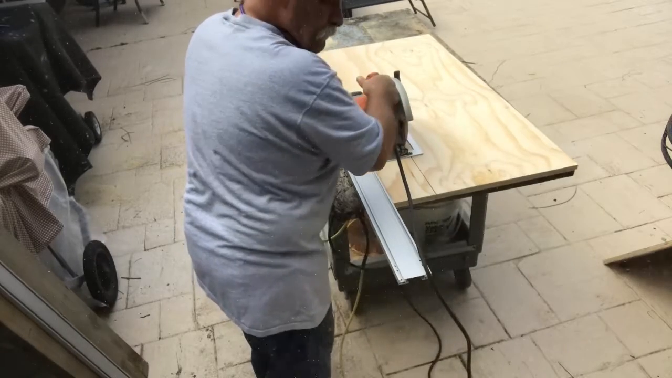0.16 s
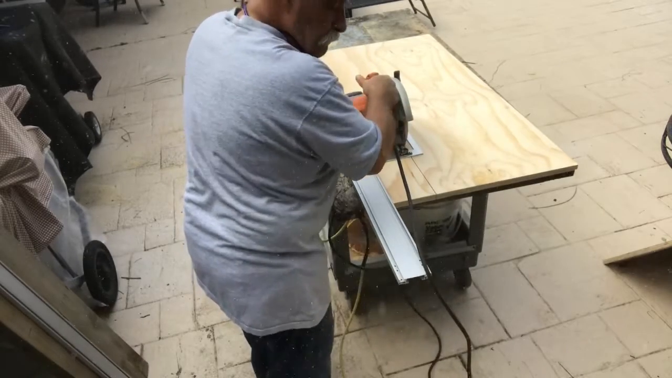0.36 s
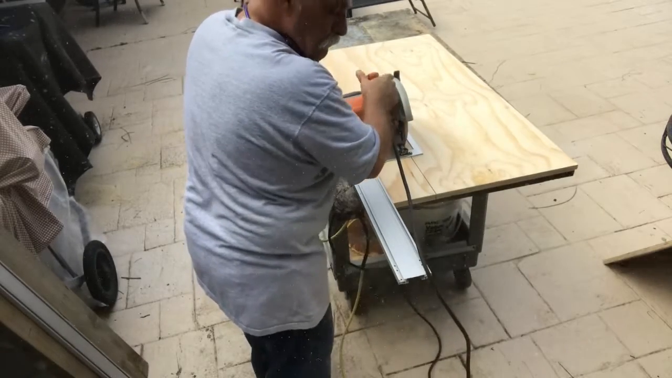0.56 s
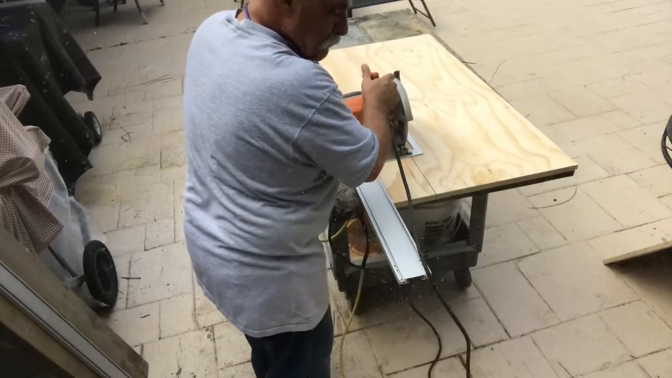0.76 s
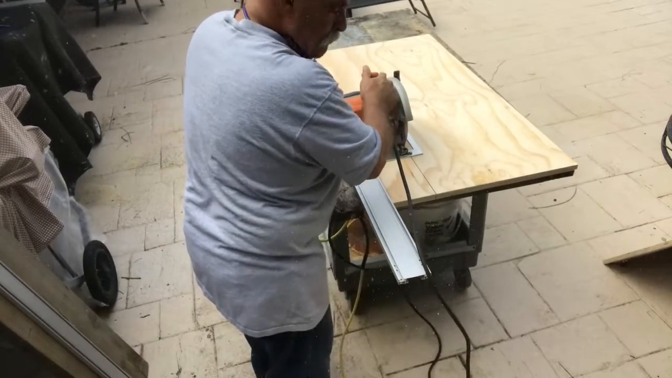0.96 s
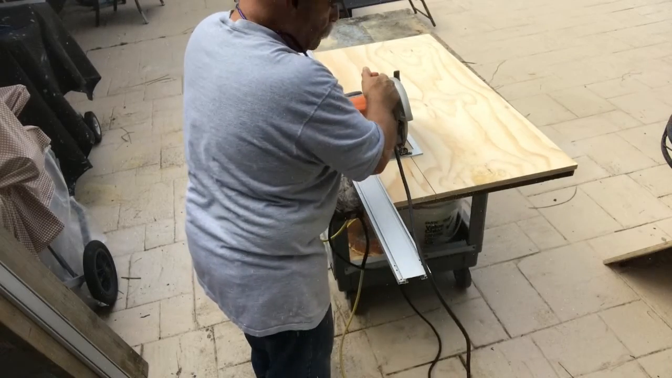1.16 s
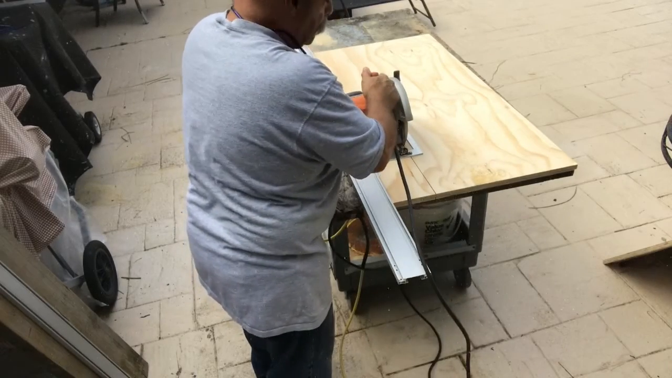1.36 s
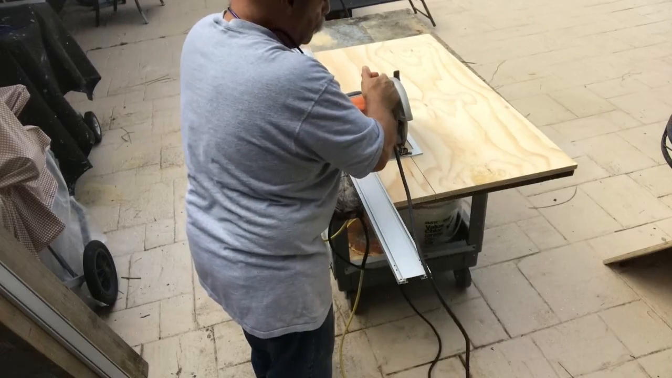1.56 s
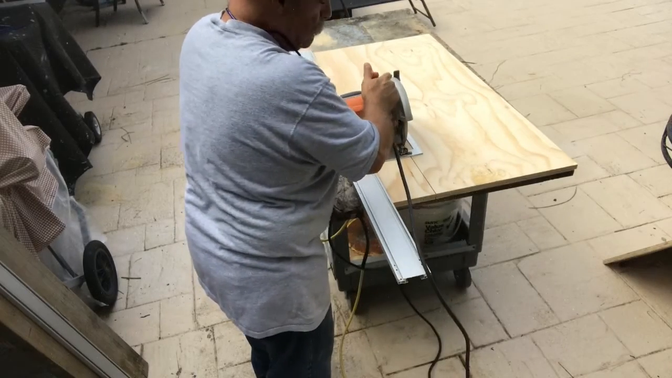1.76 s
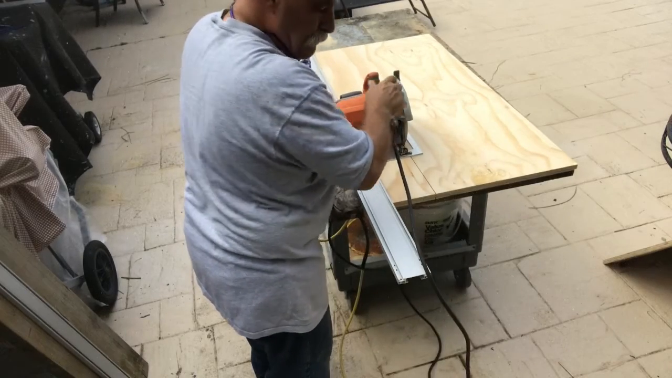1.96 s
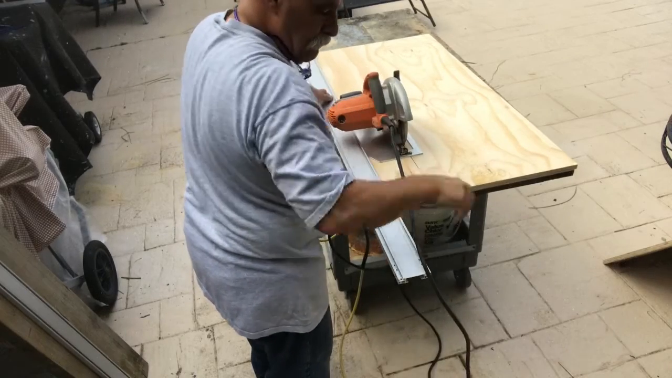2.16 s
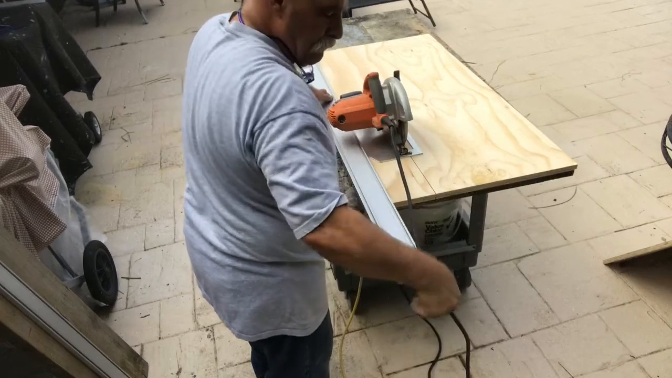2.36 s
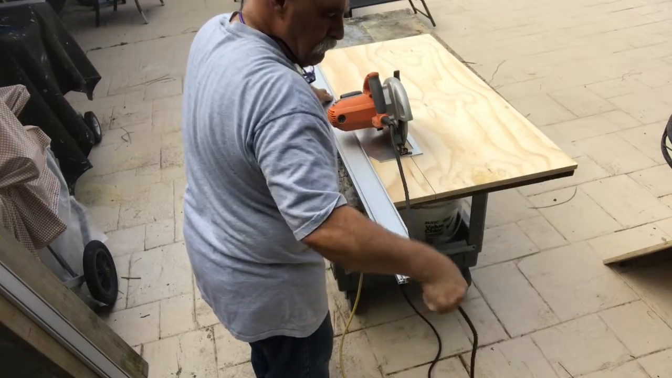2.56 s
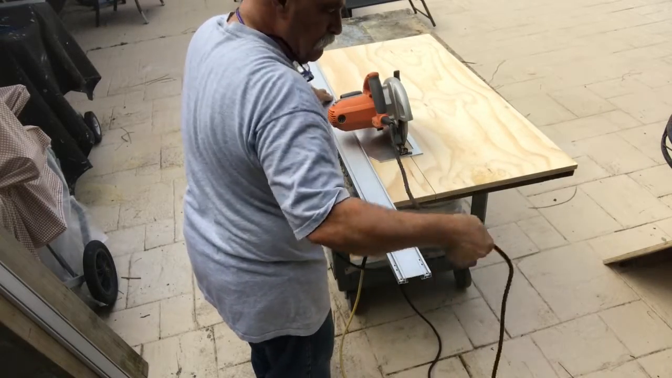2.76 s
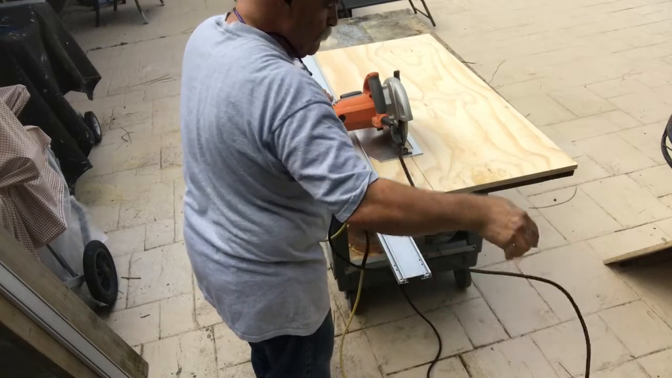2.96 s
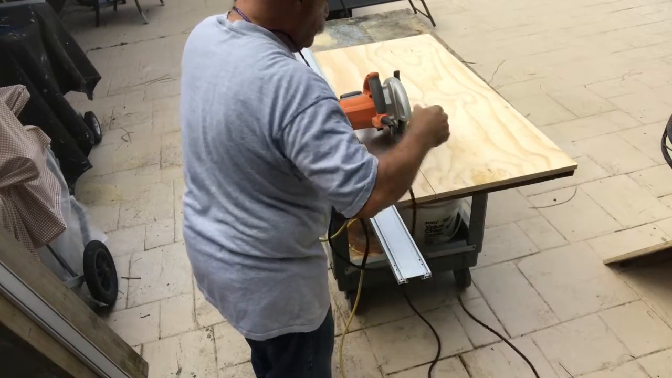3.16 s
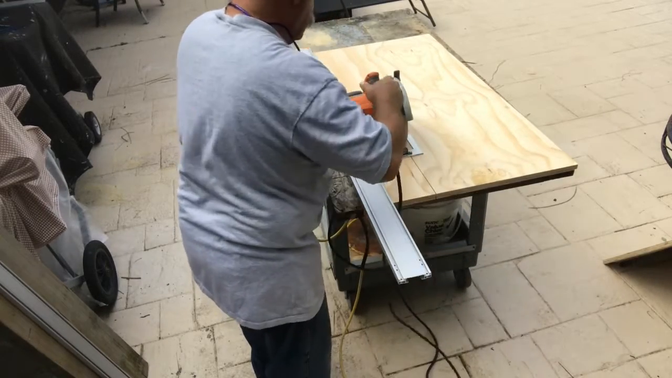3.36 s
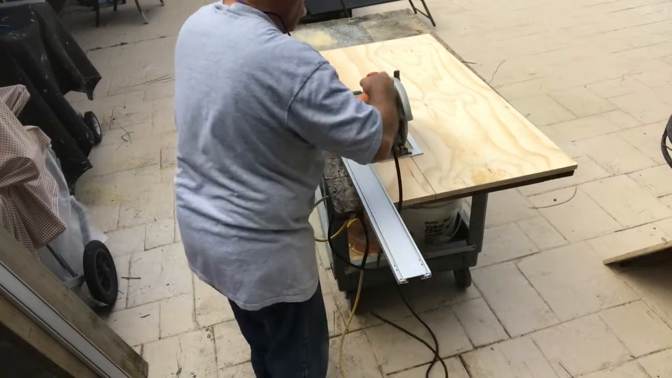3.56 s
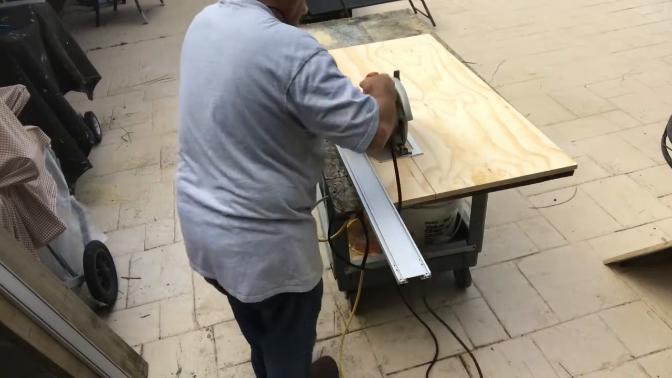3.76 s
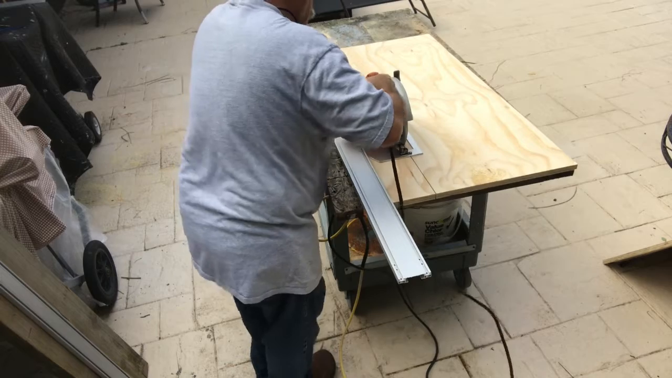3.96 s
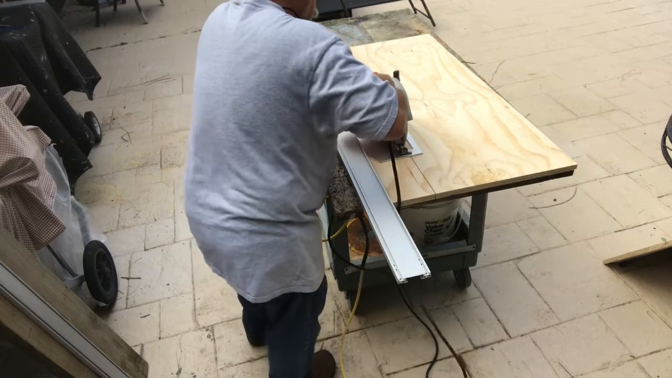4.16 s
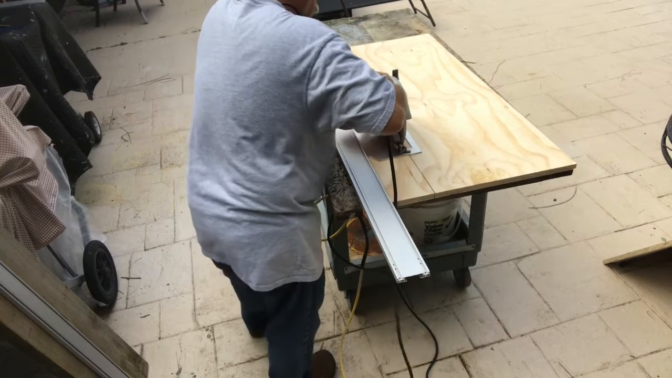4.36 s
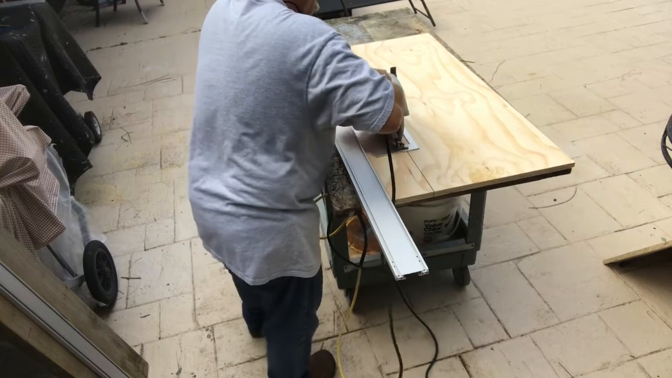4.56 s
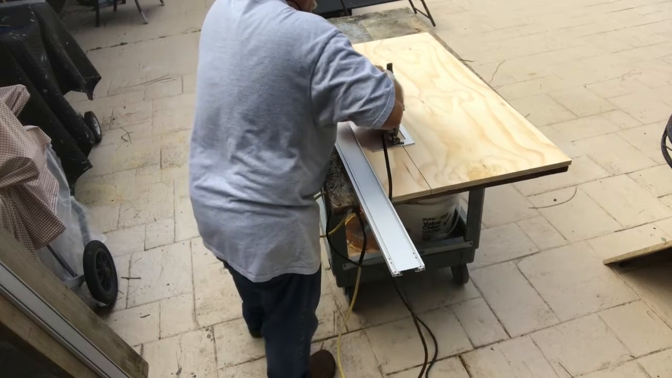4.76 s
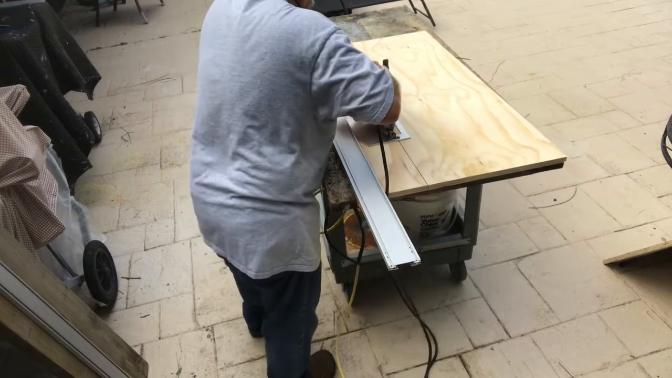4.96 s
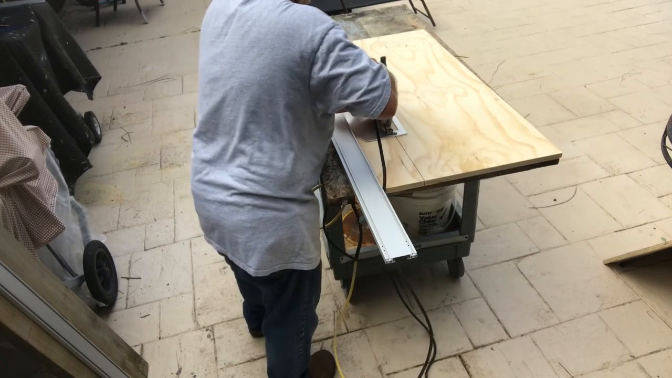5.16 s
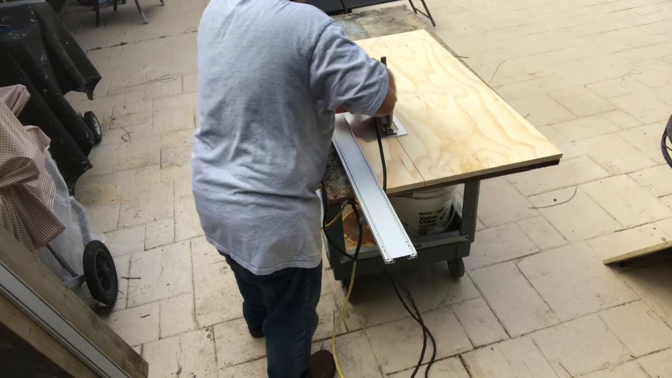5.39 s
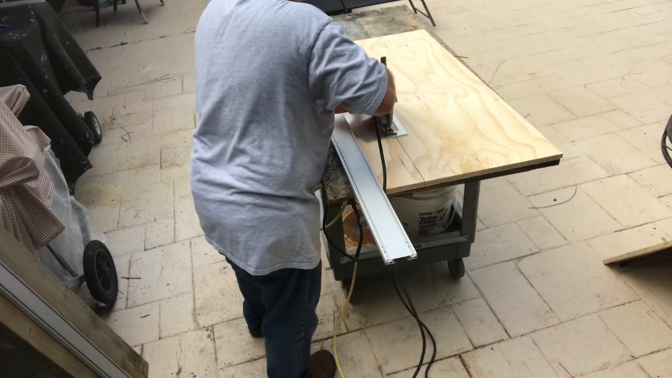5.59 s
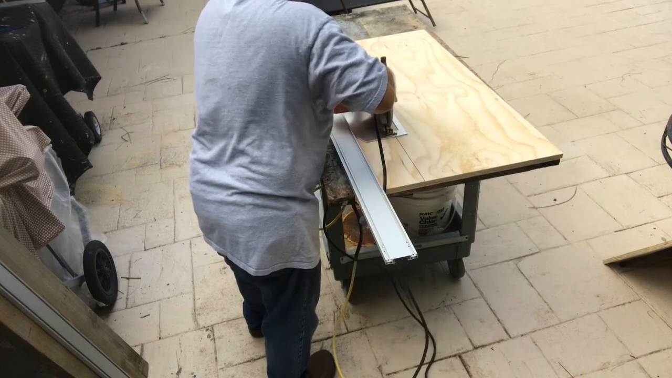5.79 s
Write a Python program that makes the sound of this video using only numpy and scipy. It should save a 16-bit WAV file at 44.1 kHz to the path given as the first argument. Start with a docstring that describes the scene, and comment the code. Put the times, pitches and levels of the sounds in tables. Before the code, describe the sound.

A circular saw coasts down with a slowing, throbbing metallic whir, stops, gets bumped and scraped into place, then roars back up outdoors.

```python
"""Circular saw coasting, then restarted

A corded saw on a plywood sheet coasts to a stop: noise bands throb once a blade turn over wavering steel modes.
It is slid (scraping noise) and knocked (short decaying tones) into place, then switched on: mains hum, gear
whine following the rising speed, rattle and air roar as filtered noise.
A distant machine drones at a steady pitch over low wind rumble."""
import sys
import numpy as np
from scipy import signal
from scipy.fft import rfft, irfft
from scipy.io import wavfile
from scipy.ndimage import uniform_filter1d

SR = 44100
rng = np.random.default_rng(int(sys.argv[2]) if len(sys.argv) > 2 else 0)


def wav_out(sig):
    """Save sig, one row per channel (or a flat mono array), as 16-bit PCM at SR to the path in sys.argv[1]."""
    wavfile.write(sys.argv[1], SR, np.round(np.clip(np.atleast_2d(sig).T, -1, 1) * 32767).astype(np.int16))


N = 257103
SWITCH_ON_S, STRAIN_ENDS_S = 4.214, 4.44


def undb(db):
    """Decibels to gain."""
    return 10 ** (np.asarray(db) / 20)


def unit(x):
    """Scale to rms 1."""
    return x / np.sqrt(np.mean(x ** 2))


def seconds():
    """Time of every sample."""
    return np.arange(N) / SR


def columns(rows, silent=None):
    s, *cols = np.transpose(rows)
    return [np.interp(seconds(), s, col, silent, silent) for col in cols]


def hertz():
    """Frequencies of the spectrum lines, raised 1 Hz to keep the log finite."""
    return np.fft.rfftfreq(N, 1 / SR) + 1


def shape(points):
    """dB of (Hz, dB) points at every spectrum line, joined on a log frequency axis."""
    hz, db = np.transpose(points)
    return np.interp(np.log(hertz()), np.log(hz), db)


def colour(x, gain):
    """Filter by a gain for each spectrum line; rms 1."""
    return unit(irfft(rfft(x) * gain, N))


def walk(rate_hz):
    """Random levels held 1 / rate_hz, smoothed twice; rms about 1."""
    hold = int(SR / rate_hz)
    levels = np.repeat(rng.standard_normal(N // hold + 1), hold)
    return unit(uniform_filter1d(uniform_filter1d(levels, hold), hold)[:N])


def tone(hz, waver_hz, rate_hz, flutter_db):
    """Sine of rms about 1 whose pitch and level wander independently."""
    level = np.sqrt(2) * undb(flutter_db * walk(rate_hz))
    phase = 2 * np.pi * np.cumsum(hz + waver_hz * walk(rate_hz)) / SR
    return level * np.sin(phase)


def decay(t, t60_s):
    """Exponential decay, 60 dB in t60_s."""
    return np.exp(-np.log(1000) * t / t60_s)


def add(out, s, blow, peak_db):
    """Lay a blow into the track at its peak level."""
    start = int(s * SR)
    out[start:start + len(blow)] += undb(peak_db) * blow / np.abs(blow).max()


def step(s, edge_s):
    """Smooth rise from 0 to 1 around time s."""
    return .5 + .5 * np.tanh((seconds() - s) / edge_s)


def swell(s, length_s, db, edge_s):
    """Gain that rises, holds and falls away."""
    return undb(db) * step(s, edge_s) * (1 - step(s + length_s, edge_s))


def switched(rise_s):
    """Time since switch-on, and a gain that builds from it."""
    since_s = np.maximum(seconds() - SWITCH_ON_S, 0)
    return since_s, 1 - np.exp(-since_s / rise_s)


# Open-air hiss spectrum: f/Hz, relative level/dB
AIR_SPECTRUM = [(260, -36), (450, -0.5), (827, -5.5), (917, -6), (2440, -7), (3870, -9), (7000, -11),
                (10000, -16), (15600, -17)]
AIR_DB = -62


def open_air():
    """Smooth hiss of open air: coloured noise with a slow level drift."""
    hiss = colour(rng.standard_normal(N), undb(shape(AIR_SPECTRUM)))
    return hiss * undb(AIR_DB + 0.74 * walk(5.7))


# Resting drone level per partial 1-4: level/dB
DRONE_REST_DB = [-61.5, -70.5, -67.5, -71.5]
# Drone swells, gain added to rest: partial number, t/s, length/s, level/dB
DRONE_SWELLS = [(2, 0.18, .5, -55.5), (4, 0.8, 0.32, -65.5), (1, .76, 0.79, -58.5), (3, 1.68, 0.53, -83),
                (3, 2.37, 0.3, -65), (4, 2.42, 0.5, -70), (1, 2.76, 0.86, -56), (2, 3.0, 0.57, -60.5),
                (4, 3.03, 0.66, -67), (3, 3.5, .27, -61.5), (1, 3.97, .12, -57)]
DRONE_HZ, SWELL_EDGE_S = 83.5, 0.022


def drone():
    """Distant machine: four wavering harmonics that swell separately."""
    out = 0
    for k, rest_db in enumerate(DRONE_REST_DB, 1):
        swells = sum(swell(*row[1:], SWELL_EDGE_S) for row in DRONE_SWELLS if round(row[0]) == k)
        out = out + tone(DRONE_HZ * k, 0.87, 20, 2.2) * (undb(rest_db) + swells)
    return out


# Fade of the coasting saw: t/s, level/dB
COAST_FADE = [(0, 0), (.6, -3.5), (1.2, -6), (1.8, -10), (2.3, -13.5), (2.45, -18), (2.57, -22.5),
              (2.63, -33), (2.75, -46.5)]


def coast_db(silent=-120):
    """Coasting level relative to the start; silent after the stop."""
    return columns(COAST_FADE, silent)[0]


# Rumble spectrum: f/Hz, relative level/dB
RUMBLE_SPECTRUM = [(25, -48), (45, -6), (70, 1.5), (130, 0.5), (220, -6), (380, -8.5), (520, -23.5),
                   (900, -39.5)]
# One gust: t/s, length/s, level/dB
WIND_GUST = (3.55, 0.64, -50.5)
WIND_DB = -56
SHAKE_COASTING_DB, SHAKE_STRAIN_DB, SHAKE_DRIVEN_DB = -52, -39, -47.5


def rumble():
    """Low noise: gusty wind, and the sheet shaken by the saw."""
    driven_db = SHAKE_STRAIN_DB + (SHAKE_DRIVEN_DB - SHAKE_STRAIN_DB) * step(STRAIN_ENDS_S, .04)
    shake = undb(SHAKE_COASTING_DB + coast_db()) + undb(driven_db) * switched(.06)[1]
    gust = swell(*WIND_GUST, 0.093)
    gain = np.sqrt(undb(WIND_DB) ** 2 + gust ** 2 + shake ** 2)
    noise = colour(rng.standard_normal(N), undb(shape(RUMBLE_SPECTRUM)))
    return noise * gain * undb(1.7 * walk(18))


# Scrape spectrum: f/Hz, relative level/dB
SCRAPE_SPECTRUM = [(590, -38), (1000, -13), (2020, -5), (2400, -6), (3270, -1), (4360, -10), (6290, -8),
                   (9850, -13), (11000, -5.5), (15600, -13)]
# Drags of the shoe plate: t/s, length/s, level/dB, rise/s
DRAGS = [(3.593, .04, -60, .008), (3.72, 0.14, -54, 0.038)]
DRAG_END_EDGE_S = 0.023


def scrape():
    """Shoe plate dragged on the ply: coloured noise with a rough level."""
    rough = rng.standard_normal(N) * undb(1.4 * walk(300))
    gain = 0
    for s, length_s, db, rise_s in DRAGS:
        gain = gain + undb(db) * step(s, rise_s) * (1 - step(s + length_s, DRAG_END_EDGE_S))
    return colour(rough, undb(shape(SCRAPE_SPECTRUM))) * gain


# Ticks: t/s, peak level/dB, lowest f/Hz, highest f/Hz, 60 dB decay/s
TICK_HITS = [(2.351, -35, 910, 4020, .015), (2.92, -49.5, 1800, 2700, .014), (2.922, -48, 2800, 5200, .01),
             (3.057, -43.5, 500, 3000, 0.047), (3.061, -40.5, 150, 925, 0.072),
             (3.499, -55, 595, 1600, 0.037), (3.597, -52, 2880, 3650, .05), (4.216, -35, 500, 8800, 0.023)]


def ticks():
    """Small hard contacts: 40 random partials with a fast attack."""
    out, t = np.zeros(N + SR), np.arange(SR // 4) / SR
    for s, peak_db, lo_hz, hi_hz, t60_s in TICK_HITS:
        place, phase = rng.random((2, 40, 1))
        hz = lo_hz * (hi_hz / lo_hz) ** place
        cluster = np.sin(2 * np.pi * (hz * t + phase)).sum(axis=0)
        add(out, s, cluster * (1 - np.exp(-t / 0.00049)) * decay(t, t60_s), peak_db)
    return out[:N]


# Thumps on the sheet: t/s, peak level/dB, f/Hz, twice the 60 dB time of the decay factor/s
THUMP_HITS = [(2.437, -37.5, 88.8, 0.03), (2.529, -47, 137, 0.03), (2.78, -40, 80.7, 0.03),
              (2.819, -39, 72.7, 0.03), (2.848, -41, 86.1, 0.035), (3.699, -36, 94.2, 0.027),
              (3.748, -33.5, 174, 0.03), (3.819, -43, 151, 0.018), (3.849, -37.5, 323, 0.018),
              (3.895, -30, 141, 0.012), (3.956, -25.5, 137, 0.018), (4.019, -29.5, 85, 0.017),
              (4.045, -36, 80.7, 0.03), (4.069, -44, 137, 0.027), (4.329, -38, 113, 0.019),
              (4.449, -29.5, 131, 0.034)]


def thumps():
    """Dull soft pushes on the sheet: two partials under a t^2 onset and fast decay."""
    out, t = np.zeros(N + SR), np.arange(SR // 4) / SR
    for s, peak_db, hz, ring_s in THUMP_HITS:
        swing = np.sin(2 * np.pi * hz * t) + .5 * np.sin(2 * np.pi * 1.59 * hz * t)
        add(out, s, swing * t ** 2 * decay(t, ring_s / 2), peak_db)
    return out[:N]


GUARD_HZ, GUARD_DB, GUARD_FADE_SHARE = 862, -50, 0.45
GUARD_DAMPED_S, GUARD_DAMPED_DB, BLADE_STOPS_S = 2.42, -6.5, 2.56


def guard():
    """Guard ring: narrow wavering tone in short flares, fading slower than the rattle."""
    fade_db = GUARD_FADE_SHARE * coast_db(silent=-200) + GUARD_DAMPED_DB * step(GUARD_DAMPED_S, 0.039)
    ring = tone(GUARD_HZ, 29.94, 45, 6.1)
    return ring * undb(GUARD_DB + fade_db) * (1 - step(BLADE_STOPS_S, .03))


# Guard edge touching the coasting blade: t/s, peak level/dB
PING_HITS = [(1.503, -39), (1.5569, -37), (1.6916, -37), (1.7634, -41), (1.8417, -38), (1.9345, -38)]
# Blade modes in a ping: f/Hz, relative level/dB, 60 dB decay/s
PING_RING = [(5800, 4, .025), (6970, -2, 0.031)]


def pings():
    """Two blade modes ring briefly at each touch."""
    out, t = np.zeros(N + SR), np.arange(SR // 8) / SR
    ring = sum(undb(db) * np.sin(2 * np.pi * hz * t) * decay(t, t60_s) for hz, db, t60_s in PING_RING)
    for s, peak_db in PING_HITS:
        add(out, s, ring * (1 - np.exp(-t / 0.0018)), peak_db)
    return out[:N]


HUM_STRAIN_DB, HUM_DB, HUM_FADE_DB_PER_S, HUM_RISE_S = -36, -45, 6, 0.065
HUM_DIES_S, HUM_DIES_DB = 5.47, -14


def hum():
    """120 Hz mains hum: strong under starting strain, then fading."""
    since_s, rise = switched(HUM_RISE_S)
    settled_db = HUM_DB - HUM_STRAIN_DB - HUM_FADE_DB_PER_S * since_s + 2 * walk(12)
    level_db = HUM_STRAIN_DB + step(STRAIN_ENDS_S, .03) * settled_db + HUM_DIES_DB * step(HUM_DIES_S, .03)
    return tone(120., 0.26, 17, 0.77) * undb(level_db) * rise ** 2


BUZZ_HZ, BUZZ_DB, BUZZ_FADE_DB_PER_S = 287.5, -47.5, 8.5


def housing_buzz():
    """Housing buzz: fluttering fixed-pitch tone, fading from switch-on."""
    since_s, rise = switched(HUM_RISE_S)
    return tone(BUZZ_HZ, 8.2, 25, 3.2) * undb(BUZZ_DB - BUZZ_FADE_DB_PER_S * since_s) * rise


# Shaft tones: multiple of the turn rate, level/dB
SHAFT_TONES = [(0.959, -53.5), (1.9, -57.5)]
SHAFT_HEARD_S = 4.75


def shaft(speed):
    """Low tones that climb with the blade, faded in during run-up."""
    return sum(tone(k * speed, 1.2, 14, 1.61) * undb(db) for k, db in SHAFT_TONES) * step(SHAFT_HEARD_S, 0.16)


WHISTLE_HZ, WHISTLE_HZ_PER_TURN_PER_S, WHISTLE_DB, WHISTLE_RISE_S = 11480, 12, -41, .15


def whistle(speed):
    """Thin high whistle whose pitch rises slightly with speed."""
    ring = tone(WHISTLE_HZ + WHISTLE_HZ_PER_TURN_PER_S * speed, 130, 350, 3)
    return ring * undb(WHISTLE_DB) * switched(WHISTLE_RISE_S)[1]


# Saw resonances: f/Hz, full width at half lift/Hz, coasting lift/dB, driven lift/dB
SAW_RESONANCES = [(650, 164, 7, 7), (887, 120, 9, 2), (1127, 230, 4, -1), (1503, 190, 6.5, 3.5),
                  (1800, 53, 5, 2), (2390, 390, 5, 2.5), (1940, 31, -2.5, 4.5), (2730, 83, 10.5, 3.5),
                  (3175, 59, 3.5, 4), (4360, 300, -1, 2.5), (5355, 160, 7.5, 7.5), (5020, 150, 2.5, 5),
                  (5430, 110, -7, -7), (5990, 140, 5.5, 2.5), (6620, 350, -5.5, -4.5), (6820, 250, 6.5, 3),
                  (9370, 270, 8, 4.5), (11100, 200, 2.5, 6.5), (12070, 450, 5, 6), (12900, 300, 3.5, 4),
                  (14800, 300, 2, 4)]


def lift_db(hz, state):
    """dB that the resonances add at hz, coasting (0) or driven (1)."""
    return sum(row[2 + state] / (1 + (2 * (hz - row[0]) / row[1]) ** 2) for row in SAW_RESONANCES)


# Gear whine: t/s, level/dB before tone levels and resonance lift
WHINE_LEVEL = [(4.5, -41), (4.62, -37), (4.75, -34), (4.9, -31), (5.05, -33), (5.3, -33), (5.45, -44),
               (5.83, -65)]
GEAR_TEETH = 38
WHINE_LIFT_SHARE = .8  # of the resonance dB


def gear_whine(speed):
    """Tooth-mesh tones follow the speed and gain level as they pass resonances."""
    out = 0
    # offset from the tooth count in turn rates, dB
    for side, db in ((-1.5, -9.5), (0.5, -13), (0.4, -4.5), (0.5, -12.5), (6.5, -12)):
        hz = (GEAR_TEETH + side) * speed
        out = out + tone(hz, 25.1, 70, 1.7) * undb(db + WHINE_LIFT_SHARE * lift_db(hz, state=1))
    return out * undb(columns(WHINE_LEVEL, silent=-120)[0])


# Steel blade modes: f/Hz, 2.5 x pitch wander/Hz, relative level/dB
BLADE_MODES = [(4350, 123.4, -3.5), (4640, 100, 3.5), (5360, 200, -2), (5900, 91, -7), (6310, 120, 3),
               (6660, 62, 1.5), (7080, 99, -0.5), (9640, 250, -5.5), (11800, 180, -8), (12300, 330, 1)]


def blade_rings():
    """Each blade mode flares and fades on its own as grit strikes it."""
    return unit(sum(undb(db) * tone(hz, width_hz / 2.5, 110, 3.5) for hz, width_hz, db in BLADE_MODES))


THROB_BROAD, THROB_SKEW, THROB_LEAD_TURNS = 0.14, 0.14, .04


def throb(turns):
    """Swell over one turn: broad with narrow gaps, slow rise, quick fall."""
    angle = 2 * np.pi * (turns + THROB_LEAD_TURNS)
    return np.cos(angle) - THROB_BROAD * np.cos(2 * angle) + THROB_SKEW * np.sin(2 * angle)


# Parts coasting: start level/dB, share of fade, last-turn change/dB, throb left in last turn 0-1
COASTING_PARTS = [(-36.5, 1.115, 0, .15), (-34, 1.134, -1, 0), (-36, 1.19, 0.5, 0.6),
                  (-37.5, 0.89, -5.5, 1)]
# Parts driven: level/dB, rise/s, strain change/dB, settling/s, climb/(dB/s)
DRIVEN_PARTS = [(-33.5, 0.0077, -0.5, 0.05, 3), (-32, 0.022, 4, 0.009, 1.36),
                (-28.5, 0.047, -4.5, 0.04, 1.16), (-29.5, 0.051, -4.5, 0.038, -1.6)]
LAST_TURN_S = 2.34


def part_gains():
    """Part gains: fading as the blade coasts; building, straining and settling once driven."""
    fade_db, last_turn = coast_db(), step(LAST_TURN_S, .015)
    coasting = [undb(db + share * fade_db + drop_db * last_turn) for db, share, drop_db, _ in COASTING_PARTS]
    driven = []
    for db, rise_s, strain_db, settle_s, climb_db_per_s in DRIVEN_PARTS:
        since_s, rise = switched(rise_s)
        strain = 1 - step(STRAIN_ENDS_S + 2 * settle_s, settle_s)
        driven.append(rise * undb(db + strain_db * strain + climb_db_per_s * since_s))
    return coasting, driven


# Ringing parts: low f/Hz, high f/Hz, throb share, throb lag/turns, grit/dB
RATTLE_PARTS = [(326, 1210, 0.44, .01, 1), (1174, 3900, 0.51, .01, 1), (3267, 9980, 0.48, .01, 1),
                (10230, 15800, 0.62, 0.0035, 1.5)]
# Body spectrum under the resonances: f/Hz, relative level/dB
BODY_SPECTRUM = [(300, -15.5), (500, -10), (800, -7.5), (1500, -2.5), (3100, -2.5), (3400, -10.5),
                 (5500, -8), (8200, -12.5), (12000, -14), (16000, -14.5)]
BLADE_DB = -11.5  # relative to a part's contact noise
TURN_AT_START = .026
THROB_FAST_DB, THROB_SLOW_DB, THROB_DRIVEN_DB = 3, 6.5, 1.1
THROB_GROWS_BELOW_TURNS_PER_S = 19


def rattle(speed):
    """Gritty gear and bearing contact rings each part; an off-centre blade swells it once a turn."""
    turns = np.cumsum(speed) / SR - TURN_AT_START
    slowness = 1 / (1 + (speed / THROB_GROWS_BELOW_TURNS_PER_S) ** 4)
    coasting_depth_db = THROB_FAST_DB + (THROB_SLOW_DB - THROB_FAST_DB) * slowness
    hz, grit, steel = hertz(), walk(900), rfft(blade_rings())
    out = 0
    for state, (gains, depth_db) in enumerate(zip(part_gains(), (coasting_depth_db, THROB_DRIVEN_DB))):
        spectrum_db = shape(BODY_SPECTRUM) + lift_db(hz, state)
        for part, gain, (*_, left) in zip(RATTLE_PARTS, gains, COASTING_PARTS):
            lo_hz, hi_hz, share, lag_turns, grit_db = part
            band = 1 / np.sqrt((1 + (lo_hz / hz) ** 24) * (1 + (hz / hi_hz) ** 24))
            contact = rng.standard_normal(N) * undb(grit_db * grit)
            ringing = colour(contact, band * undb(spectrum_db)) + undb(BLADE_DB) * irfft(steel * band, N)
            kept = 1 if state else 1 - (1 - left) * step(LAST_TURN_S, 0.036)
            swell_db = kept * share * depth_db * throb(turns - lag_turns) + 0.8 * walk(30)
            out = out + ringing * gain * undb(swell_db)
    return out


# Blade speed, friction stops it, the motor winds it up: t/s, turn rate/(turns/s)
BLADE_SPEED = [(0, 48.24), (.6, 34.03), (1.2, 22.28), (1.8, 12.06), (2.3, 4.9), (2.5, 4.6), (2.7, 0),
               (4.21, 0), (4.45, 49), (4.6, 62), (4.7, 67.6), (4.8, 71), (5.0, 75.6), (5.4, 85.4),
               (5.83, 89)]


def scene():
    """Yard, hands and saw in the open air."""
    speed, = columns(BLADE_SPEED)
    background = open_air() + drone() + rumble()
    handling = scrape() + ticks() + thumps()
    motor = hum() + housing_buzz() + shaft(speed) + whistle(speed) + gear_whine(speed)
    return (background + handling + guard() + pings() + motor + rattle(speed))[None]


TOP_HZ = 15720


def record(dry):
    """Cut the deepest bass gently and the top steeply."""
    low_cut = signal.sosfilt(signal.butter(2, 52, "high", fs=SR, output="sos"), dry)
    return signal.sosfilt(signal.ellip(12, .3, 75, TOP_HZ, fs=SR, output="sos"), low_cut)


dry = scene()
out = record(dry)
wav_out(out)
```